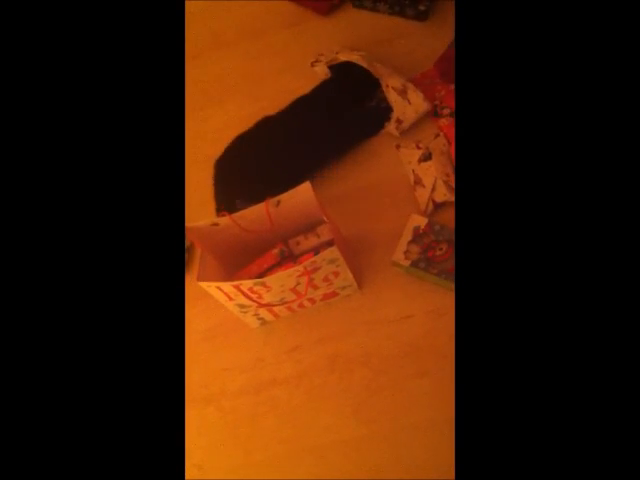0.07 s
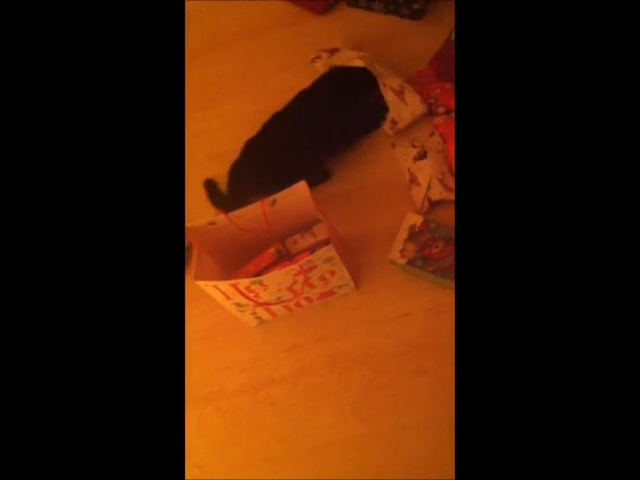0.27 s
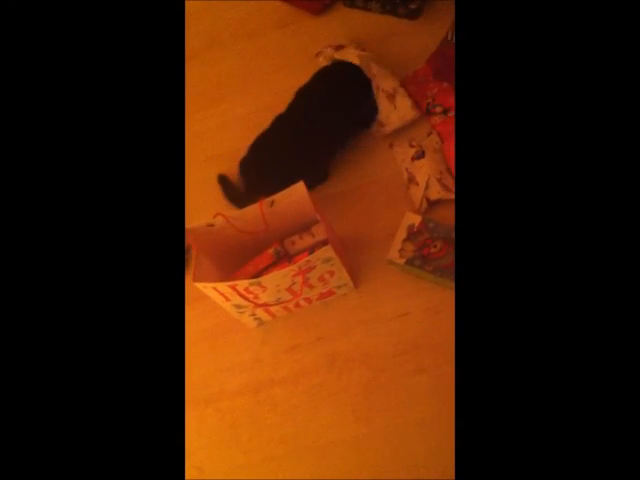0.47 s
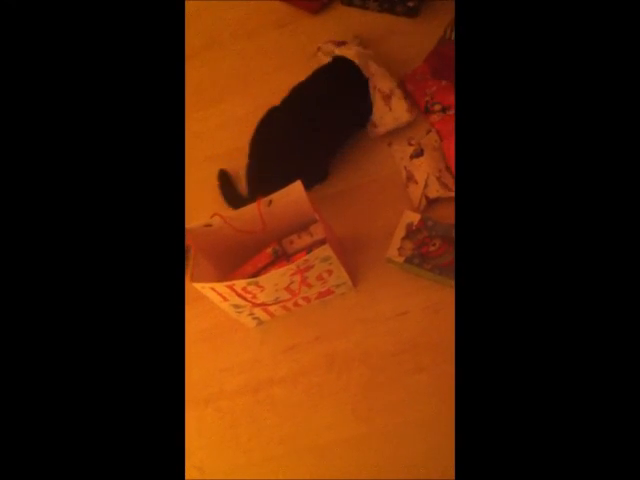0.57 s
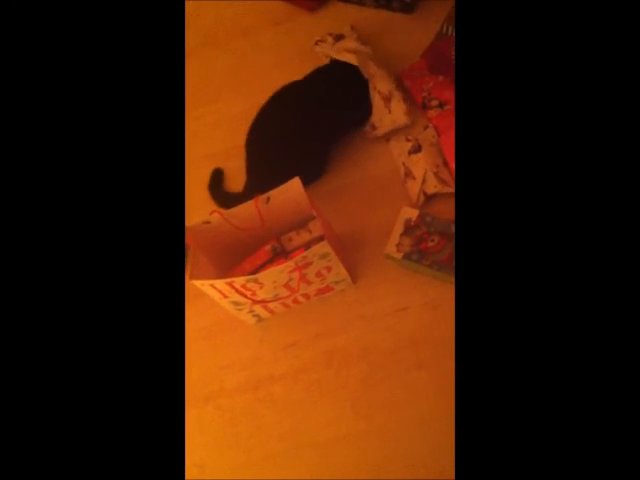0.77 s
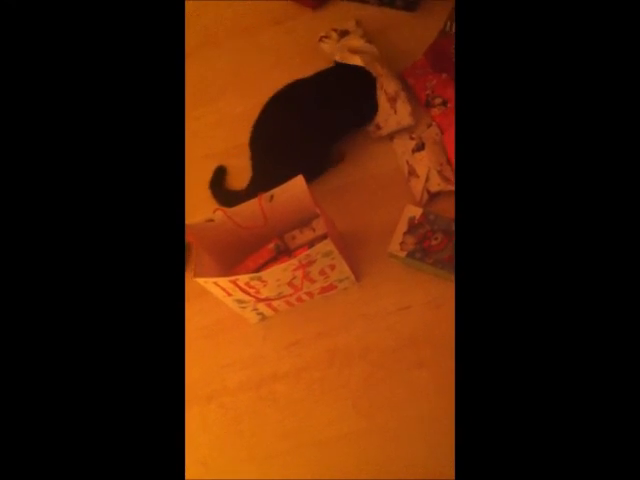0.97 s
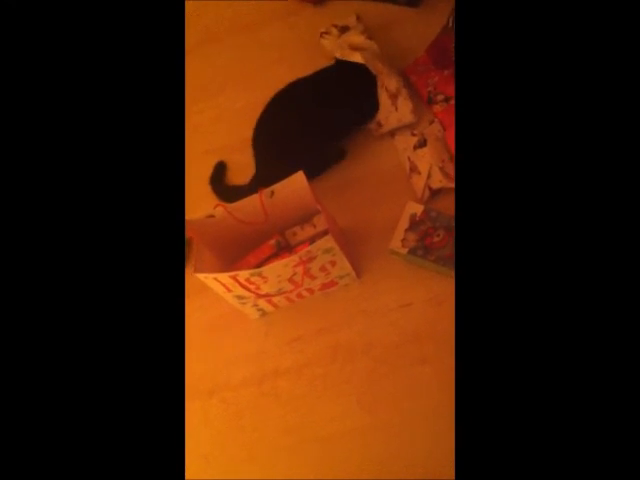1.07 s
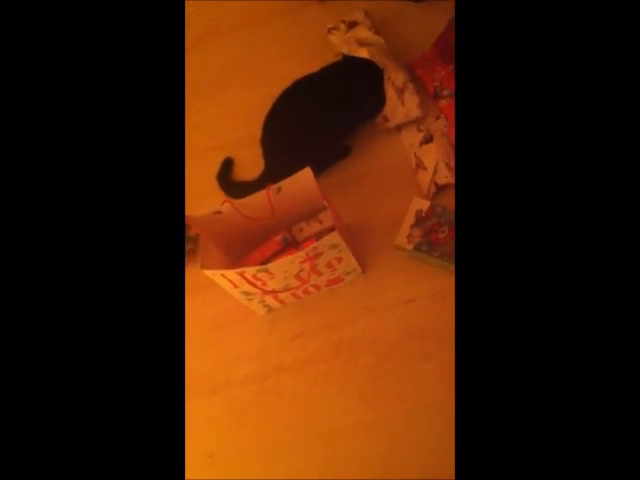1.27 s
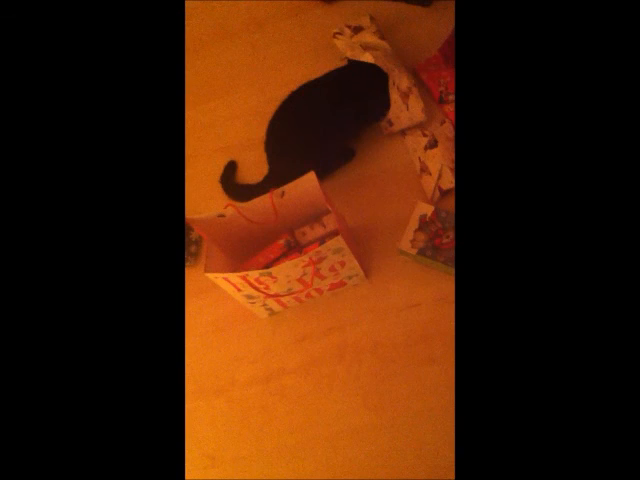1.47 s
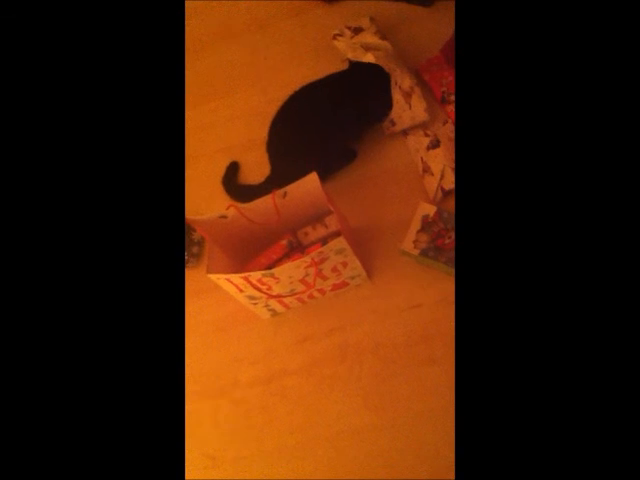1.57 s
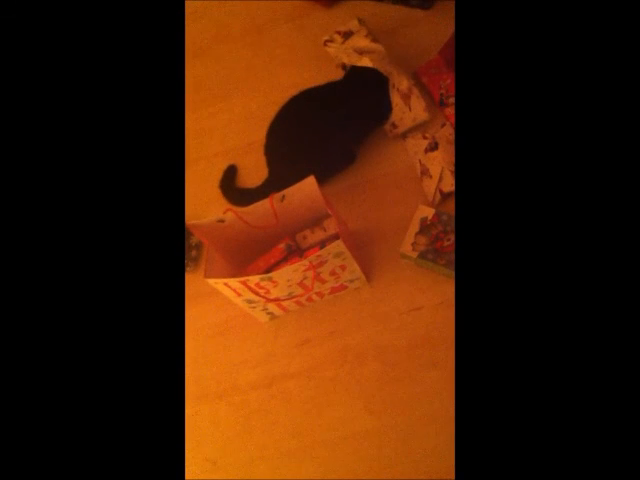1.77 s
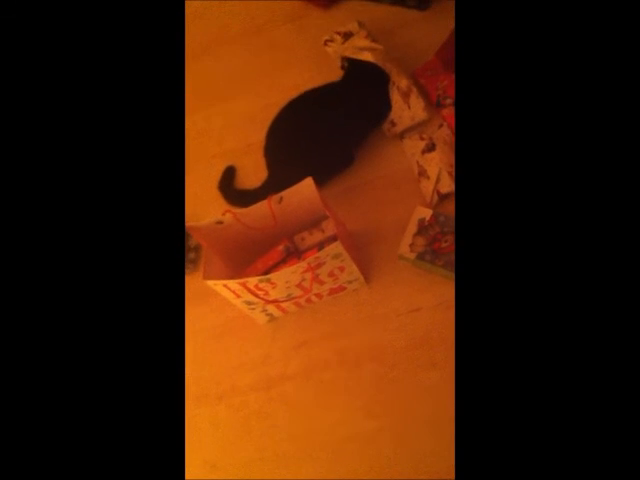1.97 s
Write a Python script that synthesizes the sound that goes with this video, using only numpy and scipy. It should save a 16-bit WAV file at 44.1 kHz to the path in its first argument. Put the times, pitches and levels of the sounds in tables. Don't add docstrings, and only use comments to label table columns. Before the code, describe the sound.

Wrapping paper crackles and rustles sharply as a cat noses into it in a quiet room

```python
import sys
import numpy as np
from scipy import signal
from scipy.fft import rfft, irfft
from scipy.io import wavfile

SR = 44100
rng = np.random.default_rng(int(sys.argv[2]) if len(sys.argv) > 2 else 0)


def volts_from_decibels(level):
    exponent = np.asarray(level, float) / 20
    return 10 ** exponent


def unload_wav(signal):
    wavfile.write(
        sys.argv[1],
        SR,
        np.round(np.clip(np.atleast_2d(signal).T, -1, 1) * 32767).astype(np.int16),
    )


N = 88773

# frequency in Hz, density in dB per Hz.
AIR_SPECTRUM = [(24, -46), (40, 5), (189, -1), (363, -3), (422, -9.5), (600, -9), (1410, -13.5),
                (1720, -15), (16000, -15.5)]
# frequency in Hz, T60 in seconds.
ROOM_T60 = [(300, 0.48), (2000, 0.17), (8000, 0.1), (15000, 0.12)]
# start in seconds, level in dB, pitch in Hz, T60 in seconds.
THUMPS = [(0.074, -49.5, 152, 0.14), (.21, -49.5, 200, 0.16), (0.4, -46, 154, 0.15),
          (0.67, -48.5, 167, 0.082), (1.183, -48.5, 260, 0.13), (.861, -48.5, 1600, 0.027),
          (1.364, -55, 1200, 0.082), (1.471, -52, 1450, .05), (1.4, -62, 1200, .04), (1.6, -53, 700, .05),
          (1.16, -53.5, 1030, 0.17), (.058, -44, 1660, 0.08), (.962, -42, 870, 0.11),
          (0.39, -41.5, 900, 0.072), (.508, -35.5, 970, 0.041)]
# time in seconds, rustle level in dB, hollowness in dB.
PUSH = [(0, -52.5, 8.5), (.05, -58, 5), (.13, -56, -9), (0.202, -46.5, 7), (.3, -53.5, 7.5), (.38, -50, 9),
        (0.468, -51.5, 1), (.56, -50.5, -8), (.65, -51, 3), (.76, -58, -6), (.83, -64, 4),
        (1.03, -54.5, 0.1), (1.15, -61.5, 2.5), (1.66, -75.5, 12), (1.75, -57, 0.5), (1.8, -58.5, 3),
        (1.845, -65, 16.5), (1.89, -57.5, 1.5)]
# frequency in Hz, level in dB.
SLIDE_SPECTRUM = [(700, -19), (1400, 2.5), (4000, 0.5), (8000, -0.5), (13000, -4), (16000, -2)]
# frequency in Hz, width in Hz, level in dB.
HOLLOW = [(235, 207, -12.5), (548, 256, -1), (876, 192, 2.03), (1230, 455, -5.5)]
# frequency in Hz, level in dB.
SHEET_SPECTRUM = [(700, -38), (1300, -13), (1700, -6.5), (2500, -2.5), (5500, -5), (8000, -8), (12000, -12),
                  (16000, -13.5)]
# start in seconds, peak in dB, centre in Hz.
CRACKS = [(0.2636, -32, 1510), (0.3212, -29, 1800), (.4015, -12, 5660), (0.4042, -13, 5070),
          (0.4055, -20, 3620), (0.407, -23, 3140), (0.4092, -26, 4050), (0.6225, -34, 5000),
          (.6262, -32, 4000), (.629, -39, 4000), (.684, -34, 2000), (0.894, -22, 8950),
          (0.9613, -20.5, 1340), (0.9611, -19.5, 7000), (1.179, -22.5, 9500), (1.1805, -38, 9000)]
# start in seconds, level in dB, hollow share in dB, brightness in dB per octave, cascade
# length in seconds.
SNAPS = [(.054, -29.5, -1.4, 0, .018), (.141, -34, -0.5, -0.3, .016), (.198, -33.5, 5.5, -1, 0.025),
         (.232, -32, 0.5, -5, 0.017), (.3205, -41, 3, -1, .012), (.396, -23.5, -13, -4, .013),
         (.41, -30, -9, -4.5, 0.056), (.502, -32, -2.5, -2, .016), (.622, -40, -7, -1, .014),
         (.682, -37.5, 1, -7.5, .014), (.7225, -34, 2, -4.5, .011), (.892, -40, -10.5, 4, .012),
         (.962, -32, -2.5, -0.8, 0.0073), (.968, -30.5, 0.1, 2, .022), (1.1765, -41, -4, 2.5, .011)]
# start in seconds, level in dB, hollow share in dB,
# brightness in dB per octave, cascade length in seconds.
MORE_CREASES = [(.033, -65, 11, 2, 0.0026), (.175, -54, 11, -11, .012), (.345, -39.5, -6, -1.5, .014),
                (.436, -37.5, 4, -5, 0.016), (.525, -49.5, -10, 4.5, 0.013), (.592, -43, -5, -18, 0.0092),
                (.603, -40, -10, -0.5, 0.016), (.775, -54, 10, -16, 0.014), (.9225, -36.5, -5.5, -7, .012),
                (.94, -51, 14.5, -2, .016), (1.0, -34, -4, -5.5, 0.022), (1.056, -52, -2, -27, 0.012),
                (1.097, -47, 3, -16, 0.016), (1.255, -67, 11, -3, 0.0091)]
# start in seconds, length in seconds, lower edge in Hz.
TREBLE_DIPS = [
    (.050, .004, 2200),
    (.490, .009, 7000),
    (.886, .003, 2800),
    (.9555, .003, 4800),
    (1.165, .008, 4500),
]


def rms_one(x):
    return x / np.sqrt(np.mean(x ** 2) + 1e-20)


def energy_one(h):
    return h / np.sqrt(np.sum(h ** 2))


def at_hz(points, hz):
    table_hz, value = np.array(points).T
    return np.interp(np.log(hz), np.log(table_hz), value)


def bandpass(x, low_hz, high_hz):
    return signal.sosfilt(signal.butter(2, [low_hz, high_hz], "band", fs=SR, output="sos"), x)


def highpass(x, hz, order):
    return signal.sosfilt(signal.butter(order, hz, "high", fs=SR, output="sos"), x)


def colour(x, spectrum):
    hz = np.maximum(np.arange(1025) * SR / 2048, 1)
    cepstrum = irfft(np.log(volts_from_decibels(np.maximum(at_hz(spectrum, hz), -80))))
    cepstrum[1:1024] *= 2
    cepstrum[1025:] = 0
    h = irfft(np.exp(rfft(cepstrum)))
    return signal.fftconvolve(x, energy_one(h))[:N]


def drift(rate_hz):
    r = np.exp(-2 * np.pi * rate_hz / SR)
    wander = signal.lfilter([1], [1, -2 * r, r * r], rng.standard_normal(N + SR))
    return rms_one(wander[SR:])


def hollow(x):
    click, ring = np.zeros(4096), 0
    click[0] = 1
    for k, (hz, width_hz, db) in enumerate(HOLLOW):
        r = np.exp(-np.pi * width_hz / SR)
        poles = [1, -2 * r * np.cos(2 * np.pi * hz / SR), r * r]
        mode = signal.lfilter([1 - r * r, 0, r * r - 1], poles, click)
        ring = ring + (-1) ** k * volts_from_decibels(db) * mode
    return signal.fftconvolve(x, energy_one(ring))[:N]


def air():
    level_db = -62
    return volts_from_decibels(level_db) * rms_one(colour(rng.standard_normal(N), AIR_SPECTRUM))


def room(x):
    level_db, delay_s, rise_s = -8.5, 0.0031, 0.0038
    t, tail = np.arange(SR // 2) / SR, 0
    white = rng.standard_normal((2, len(t)))
    for k, low_hz in enumerate(150 * 2. ** np.arange(7)):
        octave = bandpass(white[k % 2], low_hz, 2 * low_hz)
        tail = tail + octave * volts_from_decibels(-60 * t / at_hz(ROOM_T60, 1.4 * low_hz))
    tail = tail * np.clip((t - delay_s) / rise_s, 0, 1)
    return volts_from_decibels(level_db) * signal.fftconvolve(x, energy_one(tail))[:N]


def thumps():
    out, t = np.zeros(N + SR), np.arange(SR // 2) / SR
    for start_s, db, hz, t60_s in THUMPS:
        puff = rms_one(bandpass(rng.standard_normal(len(t)), 0.73 * hz, 1.62 * hz))
        onset = 1 - np.exp(-t * hz / 1.9)
        out[int(start_s * SR):][:len(t)] += volts_from_decibels(db - 60 * t / t60_s) * onset * puff
    return out[:N]


def slip_grains():
    grains_per_s, spread_db, clump_db = 12000, 2.0, 0.8
    size = volts_from_decibels(spread_db * np.minimum(rng.exponential(1, N), 4)) * rng.choice([-1, 1], N)
    slips = rng.random(N) < grains_per_s / SR
    return size * slips * volts_from_decibels(clump_db * drift(37.5))


def rustle():
    time_s, level_db, hollow_db = np.transpose(PUSH)
    t = np.arange(N) / SR
    sliding = rms_one(colour(slip_grains(), SLIDE_SPECTRUM))
    folds = rms_one(hollow(slip_grains())) * volts_from_decibels(np.interp(t, time_s, hollow_db) - 12.0)
    return volts_from_decibels(np.interp(t, time_s, level_db) + 0.5) * (sliding + folds)


def cracks():
    width_share = 0.89
    out, t = np.zeros(N + SR), np.arange(400) / SR
    for start_s, db, hz in CRACKS:
        flip = np.sin(2 * np.pi * hz * t) * np.exp(-np.pi * width_share * hz * t)
        out[int(start_s * SR):][:len(t)] -= volts_from_decibels(db + 6.0) * highpass(flip, 0.4 * hz, 1)
    return out[:N]


def creases(count=520):
    body_db, tick_db, loss_db, spread_db, rise_share = 4, -4.5, 7.5, 4.6, 0.25
    rows = np.array(list(SNAPS) + list(MORE_CREASES))
    start_s, level_db, hollow_db, bright_db, length_s = np.split(rows, 5, axis=1)
    draw = rng.random((len(rows), count, 3))
    place = 2 * (np.arange(count) + draw[..., 0]) / count
    sign = np.sign(draw[..., 1] - 0.5)
    part = (5 * draw[..., 2]).astype(int)
    at = ((start_s + place * length_s) * SR).astype(int)

    chance_db = spread_db * np.clip(rng.standard_normal(at.shape), -2, 2)
    swell = np.minimum(place / rise_share, 1)
    size = swell * volts_from_decibels(level_db + tick_db - loss_db * place ** 1.93 + chance_db)
    tilt = np.array([0, -0.5, 0, 1, 2.5])[part]
    part_db = np.where(part == 0, hollow_db + body_db, bright_db * tilt + 3 * part)
    trains = np.zeros((5, N))
    np.add.at(trains, (part, at), size * sign * volts_from_decibels(part_db))

    edges_hz = [900, 2500, 5000, 10000, 19000]
    sheet = sum(bandpass(trains[k + 1], edges_hz[k], edges_hz[k + 1]) for k in range(4))
    return hollow(trains[0]) + colour(sheet, SHEET_SPECTRUM)


def scene():
    paper = creases() + cracks() + rustle() + thumps()
    return (paper + room(paper) + air())[None]


def low_pass(x):
    return signal.sosfilt(signal.butter(12, 16810, fs=SR, output="sos"), x)


def record(dry):
    dip_db, fade_s, cutoff_hz = -22, 0.0007, 15850
    x, t = highpass(dry, 129.6, 4), np.arange(N) / SR
    for start_s, length_s, hz in TREBLE_DIPS:
        treble = signal.sosfiltfilt(signal.butter(6, hz, "high", fs=SR, output="sos"), x)
        inside_s = np.minimum(t - start_s, start_s + length_s - t)
        x = x - (1 - volts_from_decibels(dip_db)) * treble * np.clip(inside_s / fade_s + 1, 0, 1)
    x = signal.sosfilt(signal.cheby2(16, 50, cutoff_hz + 150, fs=SR, output="sos"), x)
    return low_pass(x)


dry = scene()
out = record(dry)
unload_wav(out)
```